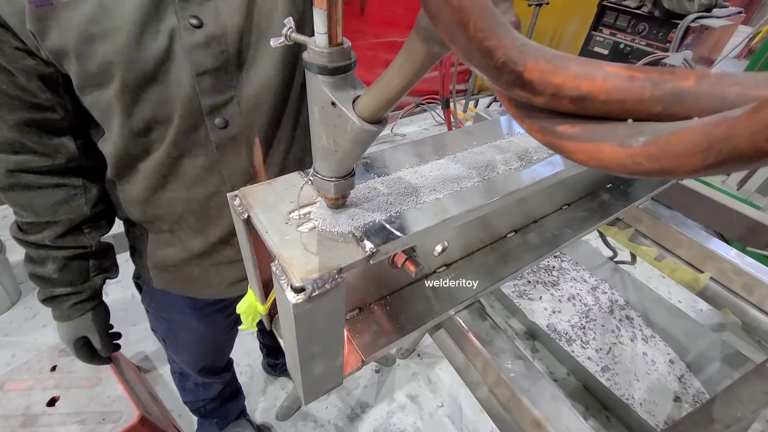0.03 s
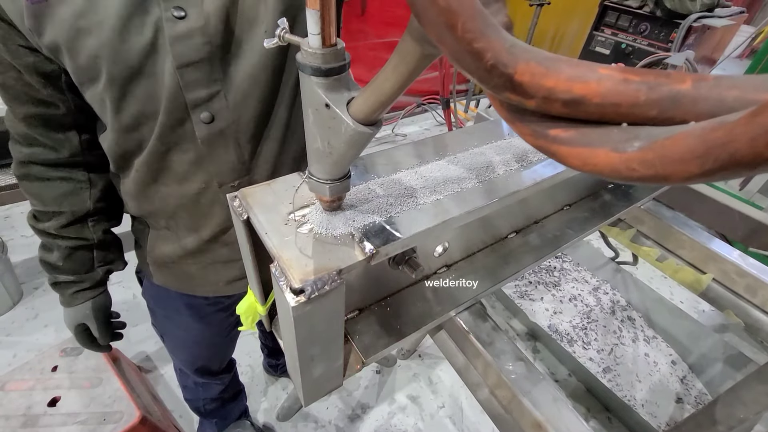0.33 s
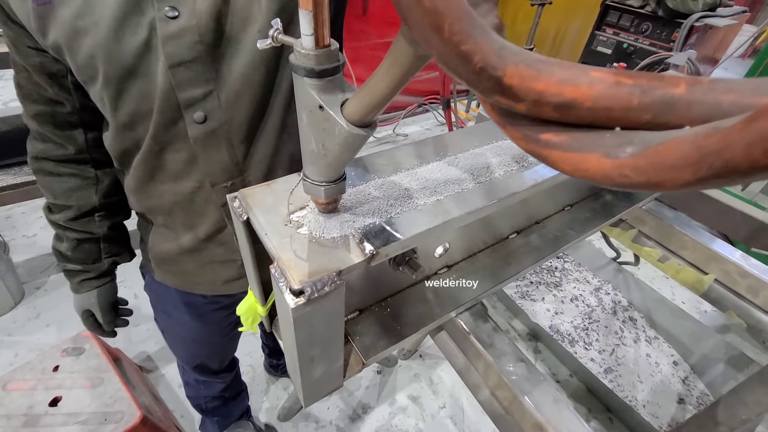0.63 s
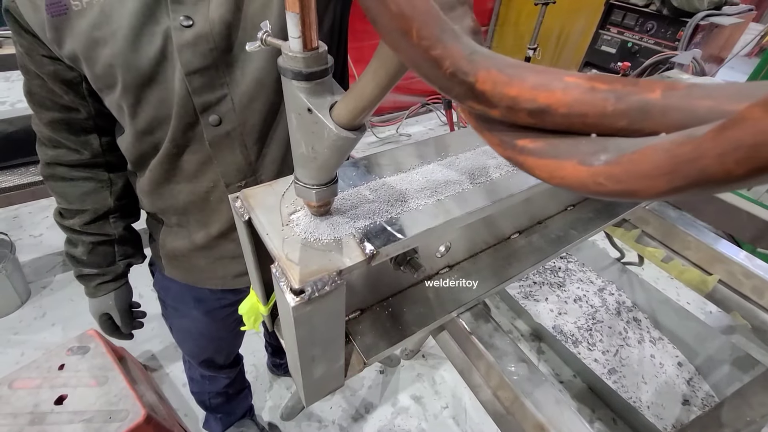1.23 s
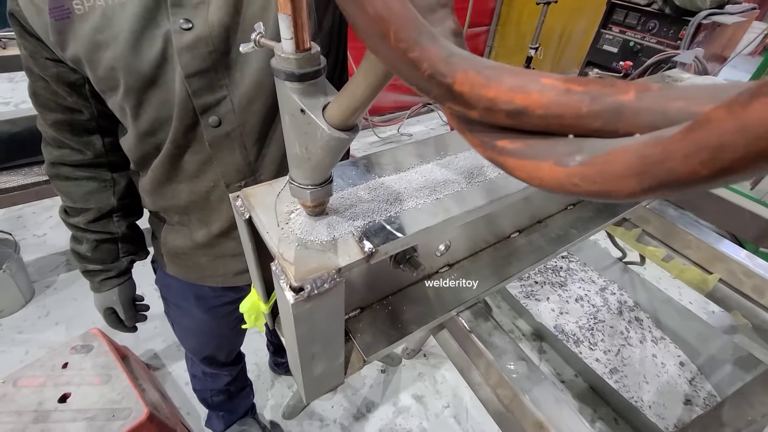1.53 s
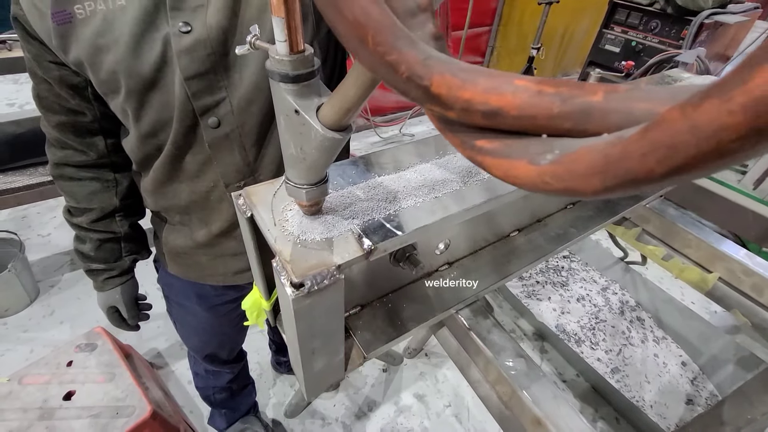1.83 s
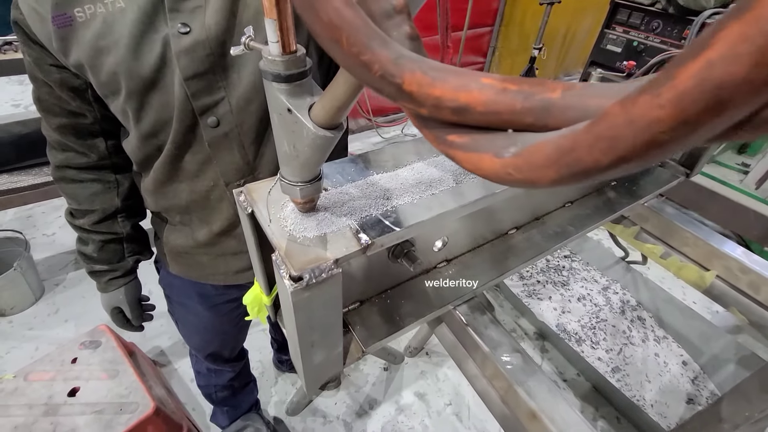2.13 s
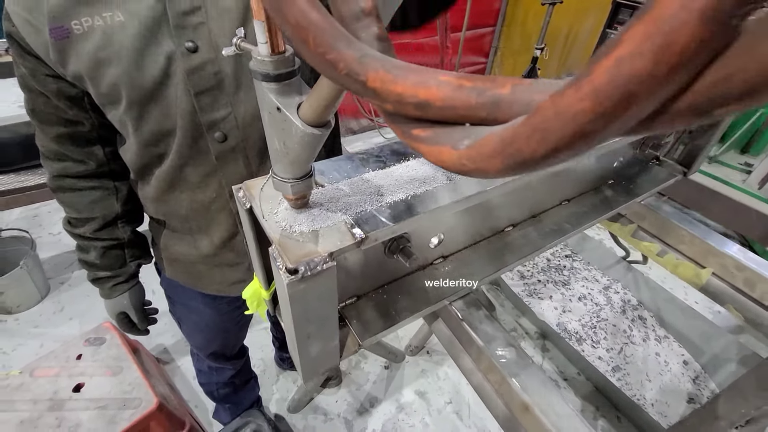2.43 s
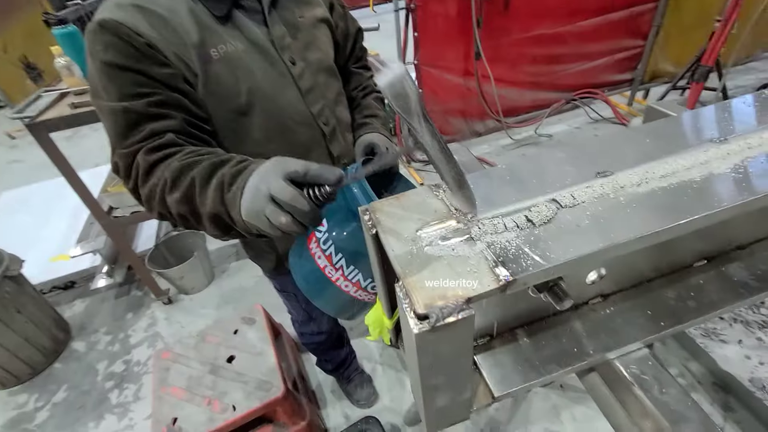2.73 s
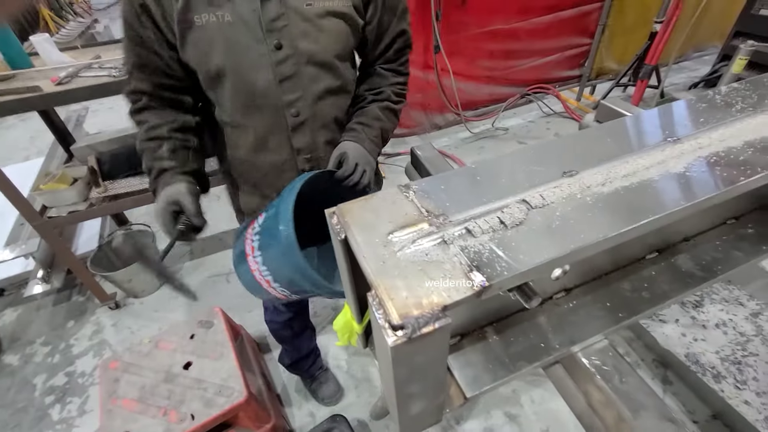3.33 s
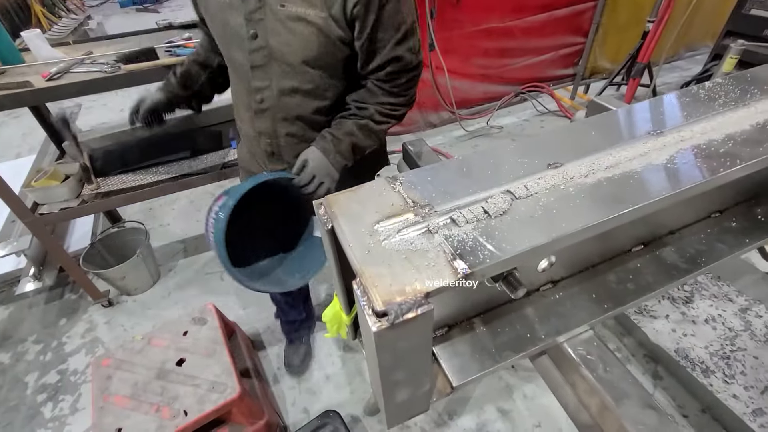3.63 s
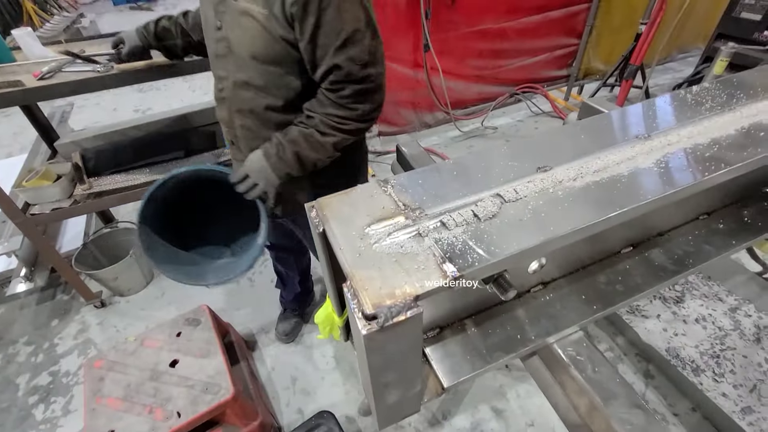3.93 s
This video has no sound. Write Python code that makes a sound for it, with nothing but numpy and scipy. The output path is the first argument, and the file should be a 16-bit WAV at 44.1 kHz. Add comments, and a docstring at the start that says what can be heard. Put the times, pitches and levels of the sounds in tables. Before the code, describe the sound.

Close by in a big workshop, an electric welder crackles and buzzes before shutting down. Two sharp hammer strikes on a steel beam follow, with brittle bits of slag landing, while machines drone throughout.

```python
"""A large workshop, a stereo microphone pair close to a steel beam. Machines drone and rush throughout.
From the start a submerged arc welder buzzes at mains harmonics while its arc sizzles and pops; a low
bump passes. At 2 s the pops cease and the welder dies away. At 2.7 s the scene changes to chipping:
a hammer strikes the slag off the weld twice, and beam and hammer ring into the hall. Two more bumps
sound, chips of slag land, and the hammer's tone swells as it is swung away."""
import sys
import numpy as np
from scipy import signal
from scipy.fft import rfft, irfft, next_fast_len
from scipy.io import wavfile
from scipy.ndimage import map_coordinates

SR = 44100
rng = np.random.default_rng(int(sys.argv[2]) if len(sys.argv) > 2 else 0)


def transcribe(u):
    """Save the signal u as a 16-bit wav file named by the first command-line argument.

    u: samples, shape (n,) or (channels, n), limited to [-1, 1]; the rate is SR.
    q: integer samples, one column per channel.
    """
    v = np.clip(np.atleast_2d(u).T, -1, 1)
    q = np.round(v * 32767).astype(np.int16)
    wavfile.write(sys.argv[1], SR, q)


N = 176400
TIME_S = np.arange(N) / SR
SCENE_CHANGE_S = 2.689  # from welding to chipping


def amp(db):
    """Decibels to gain."""
    return 10 ** (np.asarray(db) / 20)


def unit(x):
    """Scale to rms 1."""
    return x / np.sqrt(np.mean(x ** 2) + 1e-20)


def along(points, hz):
    """Read (freq_hz, value) points on a log frequency axis."""
    freqs, values = np.transpose(points)
    return np.interp(np.log(hz + 1), np.log(freqs + 1), values)


def curve(points):
    """Read (time_s, value) points at every sample."""
    return np.interp(TIME_S, *np.transpose(points))


def wobble(rate_hz):
    """A smooth random curve, rate_hz knots a second."""
    return map_coordinates(rng.standard_normal(int(N * rate_hz / SR) + 4), [TIME_S * rate_hz])


def decay(start_s, t60_s):
    """An envelope that jumps up and dies away."""
    age = TIME_S - start_s
    return (age >= 0) * amp(-60 * np.clip(age / t60_s, 0, 10))


def pan(left_db):
    """Gains of the two microphones, with a mean of 1; left_db is left over right."""
    gains = amp(np.array([np.atleast_1d(left_db), -np.atleast_1d(left_db)]) / 2)
    return gains / gains.mean(0)


def filtered(x, response):
    """Apply a gain that depends on frequency."""
    size = next_fast_len(N + 8192)
    return irfft(rfft(x, size) * response(np.fft.rfftfreq(size, 1 / SR)), size)[..., :N]


def colour(x, spectrum):
    """Shape the spectrum, keeping the power of white noise."""
    return filtered(x, lambda hz: unit(amp(along(spectrum, hz))))


def placed(x, balance):
    """Lean each frequency to its side."""
    return filtered(x, lambda hz: pan(along(balance, hz)))


# How alike the two microphones hear the hall: freq_hz, correlation
MIC_LIKENESS = [(100, 0.96), (280, 0.95), (1000, 0.02)]
# The hall's lean across the pair: freq_hz, left_db
HALL_BALANCE = [(400, 0), (1200, 0.5), (4500, -12), (12000, -2.5)]
def rush(spectrum):
    """Diffuse noise from all round, alike at both microphones in the bass."""
    def mid_side(hz):
        angle = np.arccos(np.clip(along(MIC_LIKENESS, hz), -1, 1)) / 2
        return np.array([np.cos(angle), np.sin(angle)])
    mid, side = filtered(colour(rng.standard_normal((2, N)), spectrum), mid_side)
    return unit(placed(np.array([mid + side, mid - side]), HALL_BALANCE))


# Machine tones out in the hall: pitch_hz, level_db
DRONE_TONES = [(99.65, -36.5), (95.2, -39.5), (696.4, -60)]
# Room tone during welding: freq_hz, gain_db
WELDING_AIR = [(25, -33), (75, -15), (130, -13.5), (700, -32), (1400, -36), (6200, -42), (16000, -105)]
# Room tone during chipping: freq_hz, gain_db
CHIPPING_AIR = [(25, -18), (97, -2.5), (130, -8.5), (220, -7.5), (560, -21.5), (1650, -25.5), (4900, -30),
                (8200, -62), (16000, -72)]
def machines(waver_db=2, drift_rad=0.56, rise_db=4.5):
    """Machines beat together over the rush of the hall; both are louder after the scene change."""
    later = TIME_S >= SCENE_CHANGE_S
    drone = 0
    for hz, db in DRONE_TONES:
        level = amp(db + waver_db * wobble(8.16))
        drone += level * np.sin(2 * np.pi * hz * TIME_S + drift_rad * wobble(10))
    air = np.where(later, amp(-31 + wobble(7)) * rush(CHIPPING_AIR), amp(-38) * rush(WELDING_AIR))
    return np.sqrt(2) * drone * amp(rise_db * later) + air


# The welder's low mains tones: harmonic_number, level_db
BUZZ_HARMONICS = [(3, -47.5), (5, -44.5), (6, -40), (8, -50.5)]
# Its running rumble: freq_hz, gain_db
RUMBLE_SPECTRUM = [(30, -10), (70, 4.5), (240, 3.5), (500, -24), (2000, -16.5)]
# Its shutdown: time_s, gain_db
SHUTDOWN = [(1.9, 0), (2.17, -4.5), (2.45, -30.5)]
def welder_buzz(mains_hz=50, waver_db=1.9, db_per_octave=-2.5):
    """The welder buzzes left of centre and rumbles, fading as it shuts down."""
    upper = [(k, -65.5 + db_per_octave * np.log2(k / 10) + 2 * rng.standard_normal())
             for k in range(9, 27)]
    buzz = 0
    for harmonic, db in list(BUZZ_HARMONICS) + upper:
        level = amp(db + waver_db * wobble(8.8))
        buzz += level * np.sin(2 * np.pi * (harmonic * mains_hz * TIME_S + rng.random()))
    return amp(curve(SHUTDOWN)) * (np.sqrt(2) * buzz * pan(3.9) + amp(-36) * rush(RUMBLE_SPECTRUM))


def arc_noise(length, lead_s=.00015, diffuse=.6):
    """The arc's direct sound reaches the left microphone first; the rest arrives scattered."""
    direct = rng.standard_normal(length)
    pair = np.array([direct, np.roll(direct, round(lead_s * SR))])
    return np.sqrt(1 - diffuse ** 2) * pair + diffuse * rng.standard_normal((2, length))


# The sizzle's underlying course: time_s, level_db
SIZZLE_LEVEL = [(0, -26.5), (1.6, -28), (2.02, -29), (2.12, -26), (2.26, -25.5), (2.33, -35.5),
                (2.397, -37.5), (2.412, -64)]
# The arc's colour from close by: freq_hz, gain_db
ARC_SPECTRUM = [(400, -23), (1000, -24.5), (2600, -14.5), (3150, -3), (4400, -9.5), (5200, -1.5), (6300, 0),
                (7000, -10), (9000, -13.5), (11000, -13.5), (13000, -6), (15000, -14)]
# Its change of colour as it dies: freq_hz, gain_db
BURNOUT_TILT = [(2200, -4.5), (5200, 4.5), (6200, -1.5)]
# Its lean across the pair: freq_hz, left_db
ARC_BALANCE = [(1500, 12.5), (4500, -11.5), (6400, -9.5), (9000, 7.5), (13000, -10)]
def arc_sizzle(build_db=7.5, build_s=0.019, duck_db=-6, duck_s=0.023, burnout_s=2.02):
    """The sizzle builds towards each pop, ducks briefly after it as under a limiter,
    and changes colour as the arc dies."""
    swell_db = np.zeros(N)
    for pop_s, *_ in ARC_POPS:
        gap_s = abs(TIME_S - pop_s)
        build = build_db * rng.uniform(0.27, 1) * np.exp(-gap_s / build_s)
        duck = duck_db * np.exp(-gap_s / duck_s)
        swell_db += np.where(TIME_S < pop_s, build, duck)
    flicker_db = 3 * wobble(1400) + 1.86 * wobble(130)
    grains = unit(amp(flicker_db) * arc_noise(N))
    burning = grains * amp(curve(SIZZLE_LEVEL) + swell_db)
    dying = filtered(burning, lambda hz: amp(along(BURNOUT_TILT, hz)))
    arc = np.where(TIME_S > burnout_s, dying, burning)
    return placed(colour(arc, ARC_SPECTRUM), ARC_BALANCE)


# Pops at the weld, each level relative within its column: peak_s, crack_db, thud_db
ARC_POPS = [(0.0489, -12, -42), (0.0746, -13.5, -37), (0.0978, -13, -34), (0.1478, -11.5, -49),
            (0.1663, -10.5, -53), (0.194, -13.5, -47), (0.22, -11.5, -59), (0.292, -12, -32),
            (0.324, -14, -56), (0.3626, -11, -49), (0.4372, -13, -31), (0.4927, -9.5, -50),
            (0.5507, -11.5, -47), (0.6058, -10, -63), (0.6422, -10.5, -54), (0.6632, -12.0, -45),
            (0.6998, -12.5, -44), (0.733, -11, -28.5), (0.7848, -11.0, -46), (0.8103, -10.5, -39),
            (0.9023, -11, -38.0), (0.9499, -11, -31), (1.0396, -12.5, -24), (1.099, -17, -35),
            (1.155, -13.5, -26), (1.2236, -9, -31), (1.291, -12, -23.5), (1.3341, -12, -55),
            (1.3909, -10.5, -30), (1.522, -11.5, -30), (1.6114, -11, -34), (1.637, -9, -28),
            (1.692, -10, -43), (1.721, -9.5, -41), (1.7834, -13, -36), (1.858, -11.5, -31),
            (1.937, -10.5, -46), (1.998, -13, -31)]
# Cracks are thinner in the mids than the sizzle: freq_hz, gain_db
CRACK_COLOUR = [(2600, -8), (5500, 4.5)]
# The thud under each crack: freq_hz, gain_db
THUD_SPECTRUM = [(500, -2), (3500, -2), (9000, -22)]
def arc_pops(rise_s=.002, width_s=0.00054, tail_db=-9, tail_t60_s=0.023):
    """The arc breaks through: a millisecond crack, a short tail and a duller thud."""
    age = np.arange(SR // 20) / SR - rise_s
    cracks, thuds = np.zeros((2, N)), np.zeros((2, N))
    tail = (age > 0) * amp(tail_db - 60 * abs(age) / tail_t60_s)
    for peak_s, crack_db, thud_db in ARC_POPS:
        start = round((peak_s - rise_s) * SR)
        burst_s = width_s * np.exp(.15 * rng.standard_normal())
        burst = np.exp(-.5 * (age / burst_s) ** 2)
        crack = (burst + tail) * np.sign(arc_noise(len(age)))
        cracks[:, start:][:, :len(age)] += amp(crack_db) * pan(-1) * crack
        thuds[:, round(peak_s * SR)] += amp(thud_db + 16.5)
    return colour(colour(cracks, ARC_SPECTRUM), CRACK_COLOUR) + colour(thuds, THUD_SPECTRUM)


def ring(modes, start_s, attack_s=0.000067):
    """Struck modes die away; the right microphone hears each at its own phase."""
    age, out = np.arange(2 * SR) / SR, np.zeros((2, N + 2 * SR))
    attack = 1 - np.exp(-age / attack_s)
    for hz, db, t60_s in modes:
        level = attack * amp(db + rng.standard_normal() - 60 * np.minimum(age / t60_s, 10))
        spread_rad = 1 - np.clip(along(MIC_LIKENESS, hz), 0, 1)
        phase = np.array([[0], [spread_rad * rng.standard_normal()]])
        out[:, round(start_s * SR):][:, :len(age)] += level * np.sin(2 * np.pi * hz * age + phase)
    return out[:, :N]


# Bumps in the workshop: start_s, level_db
BUMP_HITS = [(0.434, -24.5), (2.768, -18.5), (3.228, -18.5)]
# Their one mode: pitch_hz, gain_db, t60_s
BUMP_MODE = [(91.5, 1, 0.37)]
def bumps():
    """Dull low bumps, centred between the microphones."""
    return sum(amp(db) * ring(BUMP_MODE, start_s) for start_s, db in BUMP_HITS)


# The hall's decay: freq_hz, t60_s
HALL_DECAY = [(200, 2.1), (4500, 1.27), (12000, 0.57)]
def hall_reverb(x):
    """Sound returns from the far walls, the treble dying first."""
    hz, age, noise = signal.stft(rng.standard_normal((2, 2 * SR)), SR, nperseg=256)
    fade = amp(-60 * age / along(HALL_DECAY, hz)[:, None])
    _, tail = signal.istft(noise * fade, SR, nperseg=256)
    return signal.fftconvolve(x, tail / np.linalg.norm(tail[0]), axes=1)[:, :N]


# Bits of slag landing: start_s, level_db
CHIP_LANDINGS = [(2.636, -46), (2.98, -24), (3.493, -27)]
# Their brittle colour: freq_hz, gain_db
CHIP_SPECTRUM = [(800, -18), (3500, 7), (9000, -14.5), (13500, -15), (16000, -4)]
def slag_chips(t60_s=0.11, grain_db=4, wet_db=-10):
    """Brittle slag lands and shatters to the right of the microphones."""
    landings = sum(amp(db) * decay(start_s, t60_s) for start_s, db in CHIP_LANDINGS)
    grains = unit(amp(grain_db * wobble(600))) * rng.standard_normal((2, N))
    direct = colour(landings * grains, CHIP_SPECTRUM) * pan(-7)
    return direct + amp(wet_db) * hall_reverb(direct)


# Blows on the weld; of the first only the tail is heard: start_s, beam_db, hammer_db, crunch_db
HAMMER_BLOWS = [(2.47, -21, -42, -6.5), (2.715, -25, -41, -14), (2.959, -26, -10.5, -17.5)]
# The steel beam's modes: pitch_hz, gain_db, t60_s
BEAM_MODES = [(1354, -4, .25), (1453, 4.5, .19), (1961, -7, .28), (2625, -3, .28), (2665, -1.5, .3),
              (2756, 0, .45), (2794, -1, .38), (3223, -7, .3), (3640, -6, .1), (3961, 0, .18),
              (4290, 4, .07), (4940, 4, .1)]
# The hammer's modes: pitch_hz, gain_db, t60_s
HAMMER_MODES = [(4709, 4, .17), (6890, -14, .04), (10930, -12, .13)]
# Slag crushed under the hammer: freq_hz, gain_db
CRUNCH_SPECTRUM = [(150, -36), (550, -0.5), (1400, -1.5), (3000, 3.5), (4400, 1.5), (5500, -8),
                   (7000, -12.5), (8500, -47), (16000, -25)]
def chipping_hammer(crunch_t60_s=0.13, contact_db=-17, contact_t60_s=0.017):
    """Each blow crushes slag and rings beam and hammer, heard from the scene change on."""
    beam = hammer = crush = contact = 0
    for start_s, beam_db, hammer_db, crunch_db in HAMMER_BLOWS:
        beam += amp(beam_db) * ring(BEAM_MODES, start_s)
        hammer += amp(hammer_db) * ring(HAMMER_MODES, start_s)
        crush += amp(crunch_db) * decay(start_s, crunch_t60_s)
        contact += amp(crunch_db + contact_db) * decay(start_s, contact_t60_s)
    crunch = colour(crush * rng.standard_normal((2, N)), CRUNCH_SPECTRUM)
    crunch += contact * rng.standard_normal((2, N))  # the bright instant of contact
    hall = hall_reverb(amp(-9) * beam + amp(-15) * hammer + amp(-4) * crunch)
    at_mics = placed(beam + crunch + hall, HALL_BALANCE) + hammer * pan(-5)
    return at_mics * (TIME_S >= SCENE_CHANGE_S)


# Swells of the hammer's tone: peak_s, level_db
SWING_SWELLS = [(3.13, -32), (3.35, -37.5), (3.56, -41), (3.821, -43)]
def hammer_swing(width_s=0.035, flutter_db=4):
    """Swung away, the hammer rings on: its tone flutters among the echoes and swells as it turns."""
    swells = sum(amp(db) * np.exp(-.5 * ((TIME_S - peak_s) / width_s) ** 2)
                 for peak_s, db in SWING_SWELLS)
    flutter = amp(flutter_db * wobble(70))
    pitch_hz = HAMMER_MODES[0][0]
    tone = np.sin(2 * np.pi * pitch_hz * TIME_S + wobble(40))
    return placed(swells * flutter * tone, HALL_BALANCE)


def scene():
    """Welding, then chipping, as they reach the microphones."""
    return (machines() + welder_buzz() + arc_sizzle() + arc_pops() + bumps()
            + slag_chips() + chipping_hammer() + hammer_swing())


def record(dry):
    """The recorder rounds off the loudest peaks and cuts the top band."""
    top_hz = 16100
    rounded = dry / (1 + dry ** 6) ** (1 / 6)
    return filtered(rounded, lambda hz: 1 / np.sqrt(1 + (hz / top_hz) ** 160))


dry = scene()
out = record(dry)
transcribe(out)
```